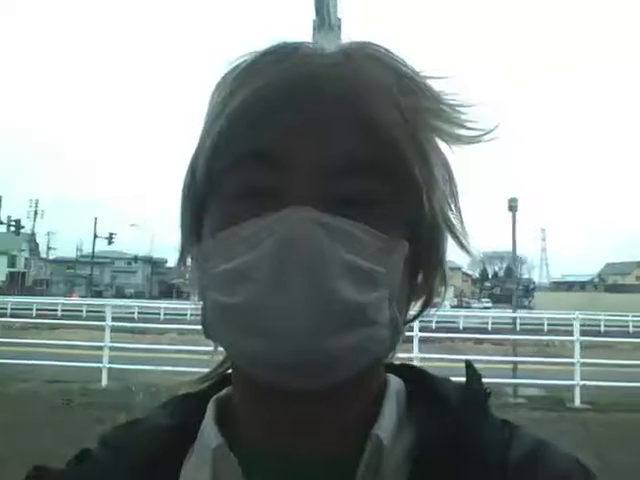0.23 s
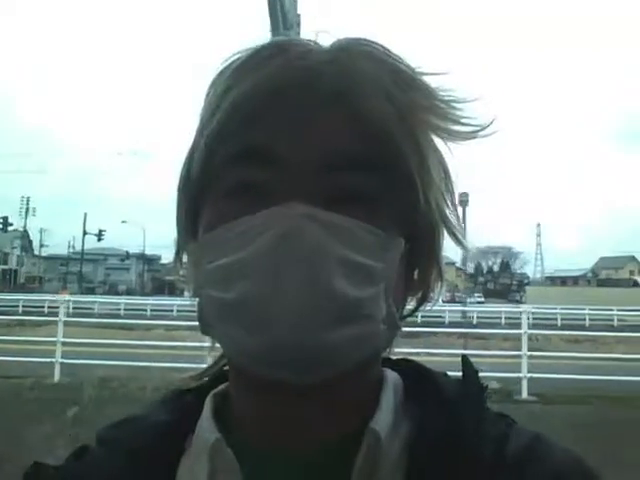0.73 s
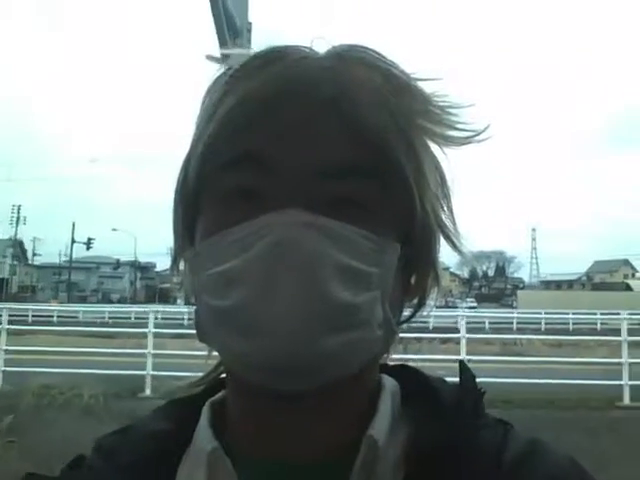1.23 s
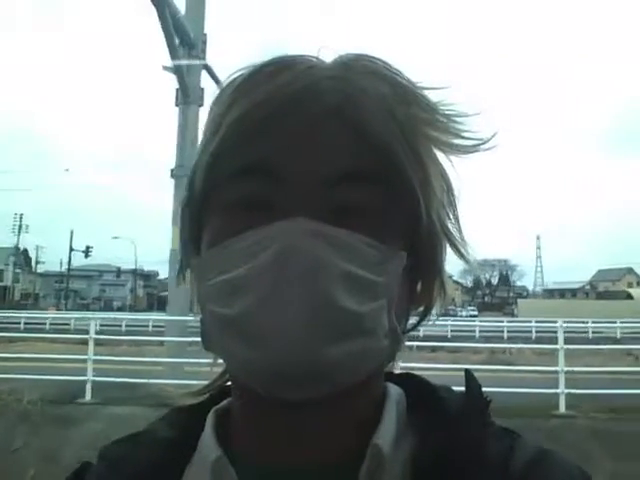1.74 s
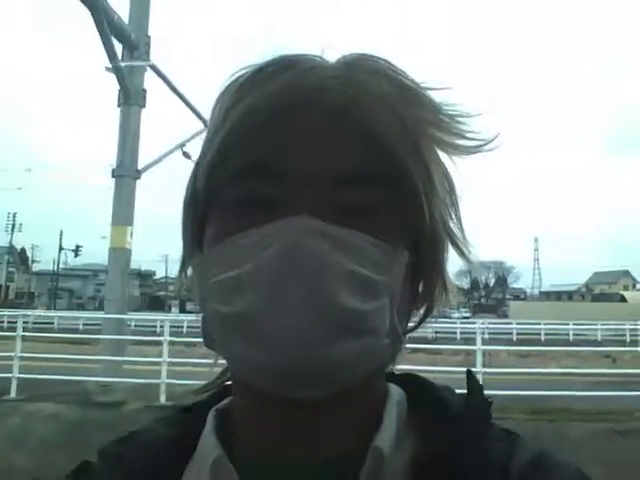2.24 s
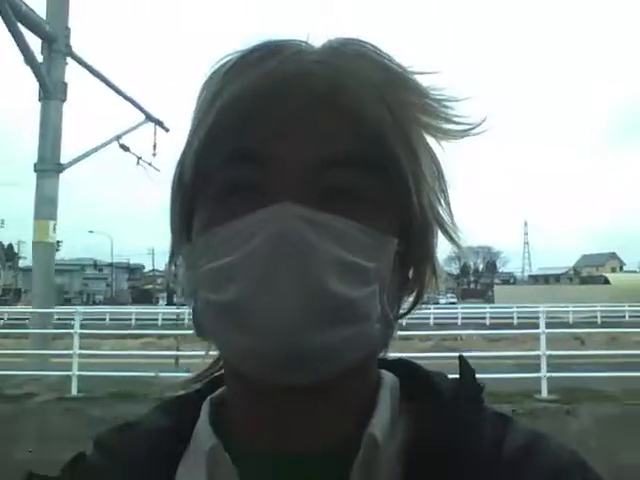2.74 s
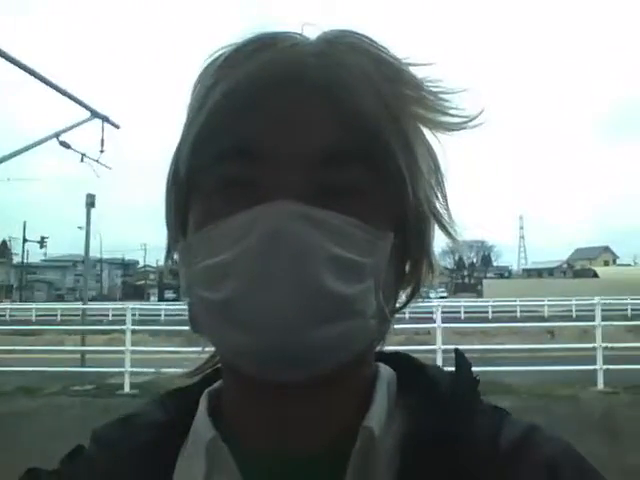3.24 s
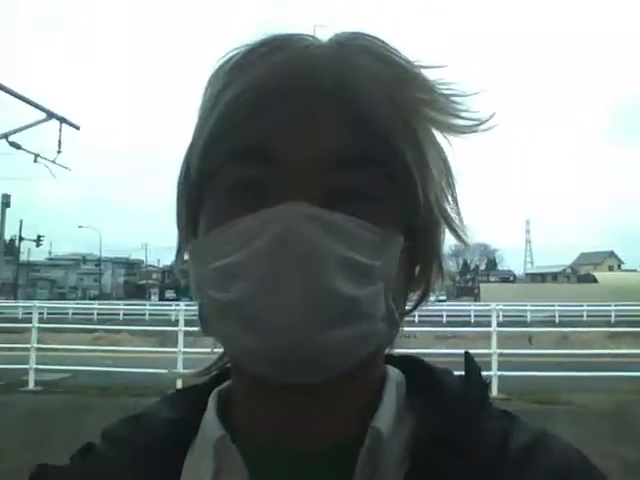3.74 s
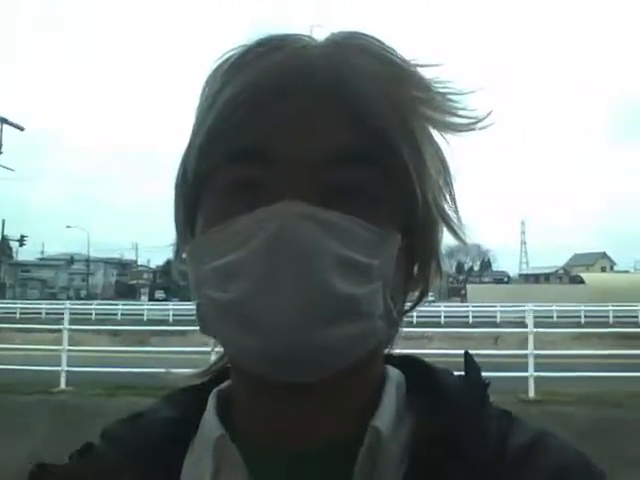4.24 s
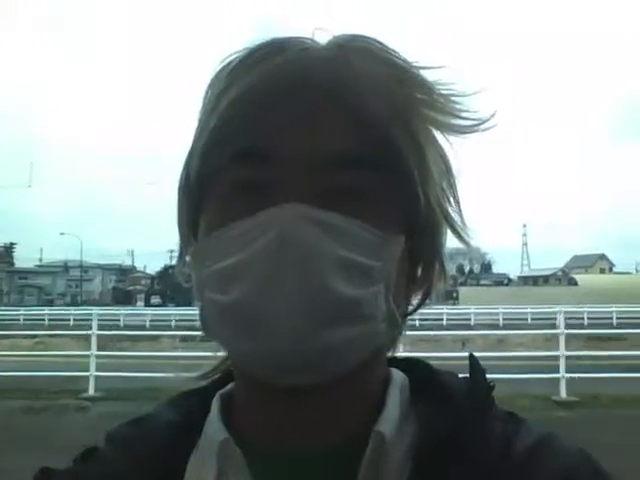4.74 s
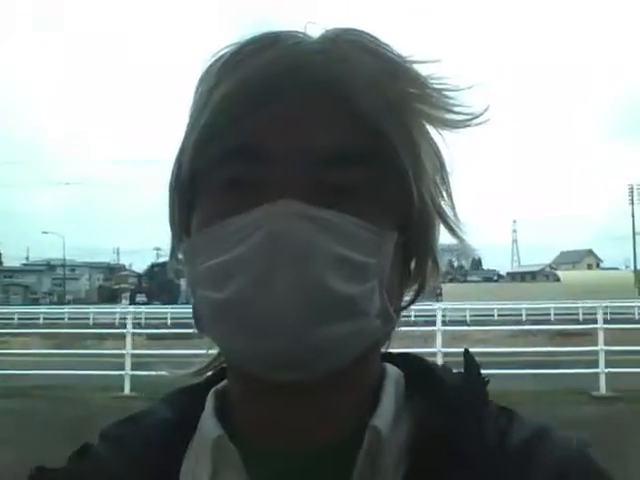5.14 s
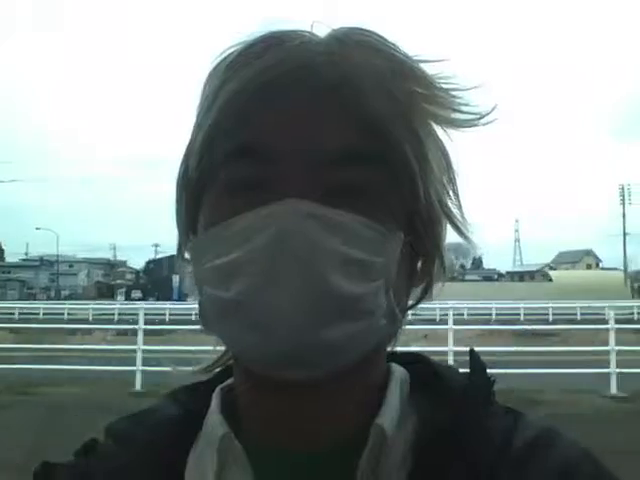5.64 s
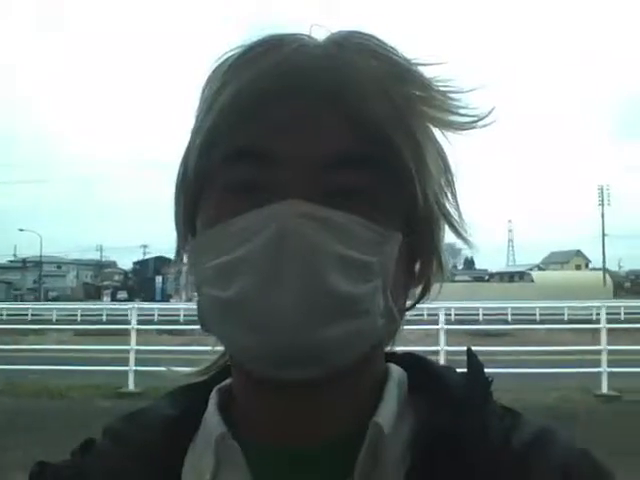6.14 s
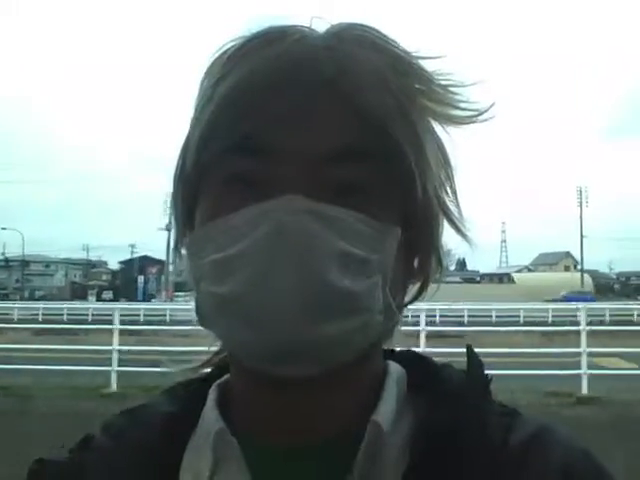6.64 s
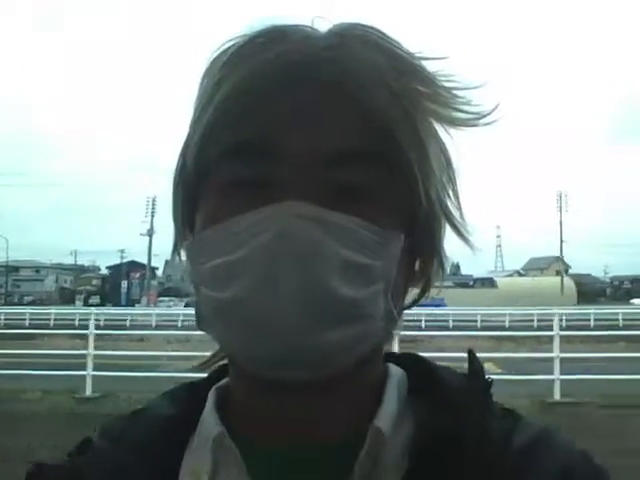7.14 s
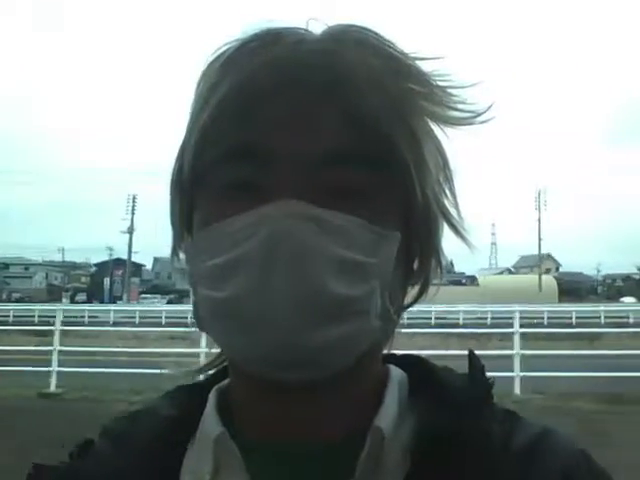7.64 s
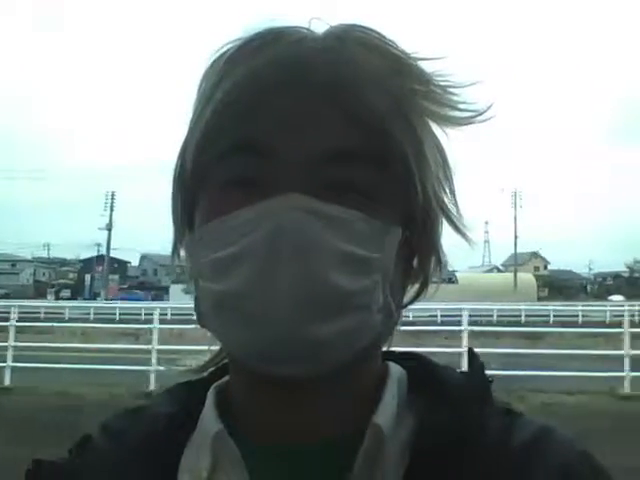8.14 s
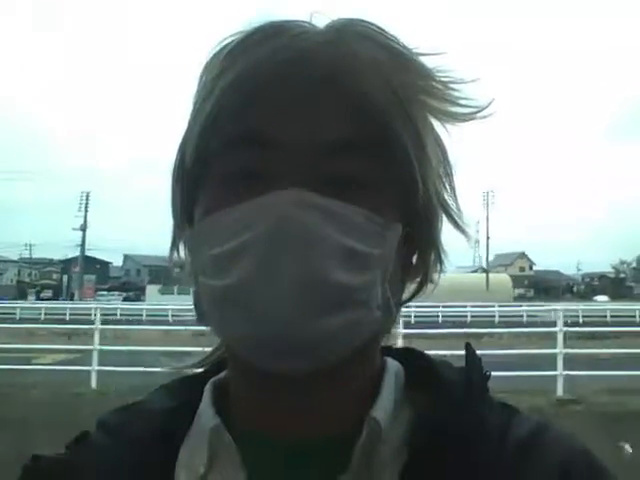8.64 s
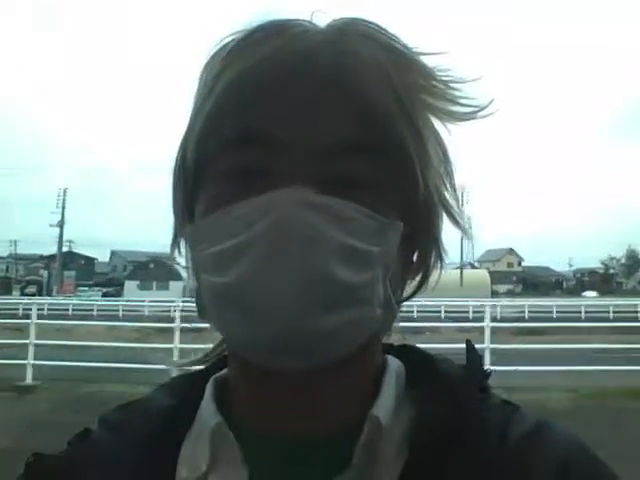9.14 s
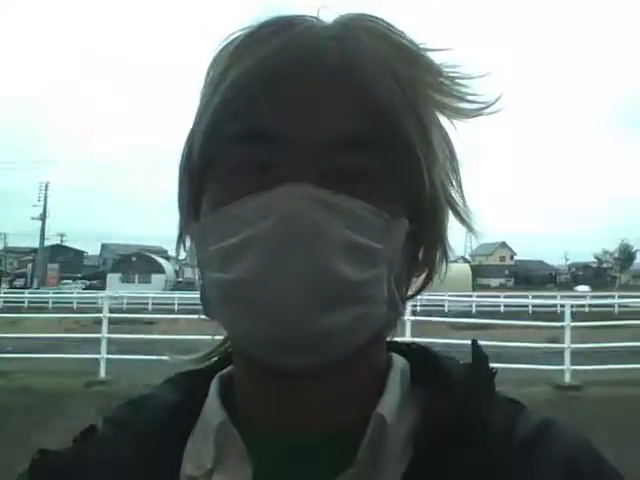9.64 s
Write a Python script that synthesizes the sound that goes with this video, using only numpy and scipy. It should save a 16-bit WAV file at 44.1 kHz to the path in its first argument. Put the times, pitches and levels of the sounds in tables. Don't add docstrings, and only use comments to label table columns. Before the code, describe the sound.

Inside a train carriage pulling away, a fixed-pitch buzzing drone from underfloor machinery dominates, with electrical hum and airy panel hiss. Close to the microphone, a small plastic object knocks twice, then ticks with a faint cloth brush. A motor whine climbs briefly, a high converter tone strengthens, rolling rumble grows, and soft thumps from rail joints arrive later, the strongest around two thirds through.

```python
import sys
import numpy as np
from scipy import signal
from scipy.fft import rfft, irfft, next_fast_len
from scipy.io import wavfile
from scipy.ndimage import map_coordinates

SR = 44100
rng = np.random.default_rng(int(sys.argv[2]) if len(sys.argv) > 2 else 0)


def convert_level_to_amplitude(level_db):
    exponent = np.asarray(level_db, float) / 20
    return 10 ** exponent


def wav_record(signal):
    frames = np.transpose(np.atleast_2d(signal))
    bounded = np.clip(frames, -1, 1)
    quanta = np.round(bounded * 32767).astype(np.int16)
    wavfile.write(sys.argv[1], SR, quanta)


N = 436149

SHAFT_HZ, TOP_ORDER = 27.9953, 535
MAINS_HZ, CHOPPER_HZ = 60.008, 1600.12
START_S, CUTOFF_HZ = .0802, 14960

# (multiple of the mains, level [dB rms])
MAINS_TONES = [(1, -55), (2, -46), (22, -63), (24, -60), (26, -61), (29, -72), (30, -62), (32, -68),
               (58, -78)]
# (frequency [Hz], level [dB rms], wander [Hz])
CARRIERS = [(3200.25, -74, .1), (14400, -82, .1), (690, -58, .5), (662, -62, .5), (1061, -65, 1.1)]
# (frequency [Hz], density [dB per Hz])
HISS = [(200, -98), (500, -77.5), (800, -80), (1000, -79.5), (2000, -84.5), (3300, -83.5), (3600, -88),
        (5500, -90), (6400, -96.5), (8000, -101), (9500, -103), (11300, -102), (11800, -107), (15000, -110)]
# (frequency [Hz], width [Hz], height over the hiss [dB])
PANELS = [(653, 21, 16), (810, 60, 5), (1130, 37, 3), (1590, 97, 1), (2340, 160, 3.5), (4800, 240, 5.5)]
# (time [s], frequency [Hz], level [dB])
WHINE = [(2.0, 625, -75), (2.4, 674, -60), (3.0, 746, -66), (3.7, 900, -68), (4.2, 990, -80)]
# (middle [s], level [dB], length [s])
JOINTS = [
    (2.57, -40, .09),
    (6.385, -31, .08),
    (6.847, -24, .105),
    (9.12, -32, .06),
]
# (time [s], peak [dB], share of low knock [0-1], pitch scale of the ticks [ratio])
CLICKS = [
    (.4935, -34, .5, 1.0),
    (.4985, -22, .9, 1.0),
    (.5425, -26, .9, .95),
    (1.467, -31, .02, 1.33),
    (1.506, -40, .2, 1.2),
]
# (time [s], level [dB rms])
CHOPPER = [(0, -55.5), (1.7, -53), (3, -49), (5.5, -45), (9.9, -45)]
# (frequency [Hz], level over the hiss density [dB])
FINE_ORDERS = [(2800, 19), (3500, 9.5), (6000, 10), (11000, 13.5), (13500, 15.5)]
# (centre [Hz], width [Hz], depth [dB])
CAPSULE_DIP = (8030, 1520, -11.5)
# (frequency [Hz], level [dB])
FLOOR_MODES = [(262, -3.5), (305, -5), (352, -4)]
# (frequency [Hz], level [dB], t60 [s])
KNOCK_MODES = [(900, -4, 0.011), (1800, -11, .008), (2300, -6, 0.0094)]
# (frequency [Hz], level [dB], t60 [s])
TICK_MODES = [(3160, -9, 0.0098), (3750, -13, .006), (4270, -4.5, 0.0078), (5040, -14, 0.0041),
              (7600, -22, .004), (11300, -18, .004), (12600, -22, .002)]
# (multiple of the shaft rate, level [dB rms], gain as the load comes
# on [dB])
STRONG_ORDERS = [(1, -41.5, 0), (2, -46.5, 0), (3, -48.7, 0), (4, -25.4, 0), (5, -40.9, 0), (6, -41.1, 0),
                 (7, -42.4, 0), (8, -38.6, 0), (9, -27.9, 0), (10, -32.2, 0), (11, -30, 0), (12, -40.6, 0),
                 (13, -51.9, -4), (14, -44.3, 0), (15, -38.1, 0), (16, -49.5, 0), (17, -45.1, 7),
                 (18, -38.5, 0), (19, -45.9, 3), (20, -40.8, 0), (21, -47.7, 0), (22, -39.1, 0),
                 (23, -48, 9), (24, -39.9, 0), (25, -48.3, -6), (26, -31.5, 4.6), (27, -52.4, -5),
                 (28, -53.4, 0), (29, -45.5, 9), (30, -53.5, 0),
                 (35, -49.4, 0), (38, -56, 6), (41, -46.7, 0), (43, -48.7, 0), (44, -52.8, 0),
                 (45, -53.5, -7), (46, -51.4, 0), (47, -52.5, 5), (54, -53, -11), (56, -53.8, 6),
                 (57, -51.5, 0), (60, -55.6, 4), (63, -55, 8), (65, -54.2, 0), (66, -54.8, 0),
                 (77, -59.4, 8), (82, -58.3, 18), (86, -59.5, 8), (88, -58.4, 4), (89, -59.2, 0),
                 (92, -61.3, 6), (94, -59.7, 5), (113, -64.7, 0)]
# (frequency [Hz], level [dB rms], gain as the load comes on [dB])
WEAK_ORDERS = [(870, -56, 3), (1010, -64.5, 1), (1430, -56, 2), (1720, -64.5, 2), (2150, -66, 5),
               (2740, -68, 4), (3100, -73, 1.5), (3360, -69.5, 1.5)]
# (time [s], share of the final speed [ratio])
SPEED = [(0, .05), (2.5, .25), (5, 0.68), (7, 0.92), (9.9, 1.07)]
# (low edge [Hz], high edge [Hz], level at rest [dB], gain at final speed [dB],
#                 lump depth [dB], lump rate [per s])
ROLLING_LAYERS = [
    (16, 54, -48.5, 9, 2.5, 3.3),
    (81, 214, -50, 14, 2.5, 4.3),
    (170, 417, -53, 10.5, 1.5, 6),
    (380, 2400, -65.5, 14, 1, 3.4),
]
# (peak [s], level [dB], rise [dB per s], fall [dB per s])
RUSTLES = [
    (1.52, -47, 190, 250),
    (2.48, -53, 170, 150),
    (6.87, -60, 150, 120),
]


def seconds():
    return np.arange(N) / SR


def in_time(rows):
    s, *columns = np.transpose(rows)
    return [np.interp(seconds(), s, column) for column in columns]


def at_hz(points, hz):
    points_hz, points_db = np.array(points)[:, :2].T
    return np.interp(np.log(hz + 1), np.log(points_hz), points_db)


def drift(rate):
    r = np.exp(-80 * np.pi * rate / SR)
    slow = signal.lfilter([1], [1, -2 * r, r * r], rng.standard_normal(N // 40 + 4002))[4000:]
    slow = (slow - slow.mean()) / slow.std()
    return np.interp(np.arange(N) / 40, np.arange(len(slow)), slow)


def band(low_hz, high_hz):
    sos = signal.butter(2, [low_hz, high_hz], "band", fs=SR, output="sos")
    noise = signal.sosfilt(sos, rng.standard_normal(N + SR))[SR:]
    return noise / noise.std()


def ring(x, hz, t60):
    r, w = convert_level_to_amplitude(-60 / (t60 * SR)), 2 * np.pi * hz / SR
    return signal.lfilter([0, np.sin(w)], [1, -2 * r * np.cos(w), r * r], x + 1e-18)


def hiss(turns):
    size = next_fast_len(N)
    hz = np.arange(size // 2 + 1) * SR / size
    colour_db = at_hz(HISS, hz)
    for panel_hz, width_hz, db in PANELS:
        colour_db += db / (1 + (2 * (hz - panel_hz) / width_hz) ** 4)
    spectrum = rfft(rng.standard_normal(size)) * convert_level_to_amplitude(colour_db) * (hz > 100)
    noise = irfft(spectrum, size)[:N] * np.sqrt(SR / 2)
    pulse_db, patchy_db = 1.0, 0.5
    return noise * convert_level_to_amplitude(pulse_db * np.sin(2 * np.pi * turns) + patchy_db * drift(6.2))


def supply():
    tones = [(k * MAINS_HZ, db, .02) for k, db in MAINS_TONES] + CARRIERS
    flutter, wander = drift(3.0), drift(1.0)
    out = np.zeros(N)
    for hz, db, wander_hz in tones:
        cycles = rng.random() + np.cumsum(hz + wander_hz * wander) / SR
        out += convert_level_to_amplitude(db + 0.99 * flutter) * np.sqrt(2) * np.sin(2 * np.pi * cycles)
    return out


def rolling():
    speed, = in_time(SPEED)
    out = np.zeros(N)
    for low_hz, high_hz, rest_db, gain_db, lumps_db, rate in ROLLING_LAYERS:
        level_db = rest_db + gain_db * speed + lumps_db * drift(rate)
        out += convert_level_to_amplitude(level_db) * band(low_hz, high_hz)
    return out


def joints():
    out = np.zeros(N)
    for s, level_db, length in JOINTS:
        swell = np.hanning(round(length * SR))
        t, at = np.arange(len(swell)) / SR, round((s - length / 2) * SR)
        for hz, db in FLOOR_MODES:
            mode = np.sin(2 * np.pi * (hz * t + rng.random()))
            out[at:at + len(t)] += swell * convert_level_to_amplitude(level_db + db) * mode
    return out


def whine():
    hz, level_db = in_time(WHINE)
    tone = np.sqrt(2) * np.sin(2 * np.pi * np.cumsum(hz) / SR)
    return convert_level_to_amplitude(level_db + 2.1 * drift(5)) * tone


def rustle():
    t, level = seconds(), np.zeros(N)
    for s, db, rise, fall in RUSTLES:
        level += convert_level_to_amplitude(db - np.maximum(rise * (s - t), fall * (t - s)))
    grain = convert_level_to_amplitude(2.5 * drift(120))
    return level * grain * (band(2500, 6100) + 0.25 * band(8500, 12500))


def clicks():
    out = np.zeros(N)
    for s, peak_db, knock, scale in CLICKS:
        touch = np.zeros(900)
        touch[[0, 1, 30, 31]] = convert_level_to_amplitude(peak_db) * np.array([.5, 0.61, -0.32, -0.26])
        low = sum(convert_level_to_amplitude(db) * ring(touch, hz, t60) for hz, db, t60 in KNOCK_MODES)
        high = np.zeros(900)
        for k, (hz, db, t60) in enumerate(TICK_MODES):
            high += (-1) ** k * convert_level_to_amplitude(db) * ring(touch, hz * scale, t60)
        out[round(s * SR):][:900] += 1.82 * (knock * low + high)
    return out


def chopper():
    level_db, = in_time(CHOPPER)
    tone = np.sqrt(2) * np.sin(2 * np.pi * CHOPPER_HZ * seconds())
    skirt = 0.38 * band(1540, 1648)
    return convert_level_to_amplitude(level_db) * (tone + skirt)


def order_levels(hz):
    scatter, swell_scatter = rng.standard_normal((2, len(hz)))
    weak = np.array(WEAK_ORDERS)
    coarse = hz < 3370
    weak_db = at_hz(weak, hz) + 4 * np.clip(scatter, -2, 1)
    fine_db = at_hz(HISS, hz) + at_hz(FINE_ORDERS, hz) + 5 * scatter
    level_db = np.where(coarse, weak_db, fine_db)
    weak_swell_db = at_hz(weak[:, ::2], hz) + 4 * swell_scatter
    fine_swell_db = 6 * (hz > 12300)
    swell_db = np.where(coarse, weak_swell_db, fine_swell_db)
    for k, db, gain_db in STRONG_ORDERS:
        level_db[round(k)], swell_db[round(k)] = db, gain_db
    return level_db, swell_db


def machine(turns):
    count, size = 12, 16384
    wobble, loose_order = 0.0009, 14
    order = np.arange(TOP_ORDER + 1)
    level_db, swell_db = order_levels(order * SHAFT_HZ)
    level_db = level_db + np.outer(np.linspace(-.5, .5, count), swell_db)
    chance = rng.standard_normal(level_db.shape) + 1j * rng.standard_normal(level_db.shape)
    change = wobble * order * chance
    loose = (order / loose_order) ** 2 * rng.standard_normal(len(order))
    phase = -np.pi / 2 * order ** 2 + loose
    lines = convert_level_to_amplitude(level_db) * np.exp(1j * phase) * (order > 0)
    lines = lines * (1 + change) / np.sqrt(1 + 2 * (wobble * order) ** 2)
    cycles = irfft(lines, size) * size / np.sqrt(2)
    cycles = np.concatenate([cycles, cycles[:, :1]], axis=1)
    return map_coordinates(cycles, [np.linspace(0, count - 1, N), turns % 1 * size], order=1)


def scene():
    turns = np.cumsum(SHAFT_HZ + .0015 * drift(0.26)) / SR
    background = hiss(turns) + supply() + rolling() + joints() + whine()
    near_microphone = rustle() + clicks()
    return (background + near_microphone + chopper() + machine(turns))[None]


def band_limit(x):
    return signal.sosfilt(signal.butter(12, 15070, fs=SR, output="sos"), x)


def record(dry):
    size = next_fast_len(N + SR // 10)
    hz = np.arange(size // 2 + 1) * SR / size
    dip_hz, width_hz, dip_db = CAPSULE_DIP
    dip = convert_level_to_amplitude(dip_db * np.exp(-(2 * (hz - dip_hz) / width_hz) ** 2))
    longer = np.pad(dry, [(0, 0), (0, size - N)], "reflect")
    coloured = irfft(rfft(longer) * dip * (hz < CUTOFF_HZ), size)[:, :N]
    switch_on = np.clip((seconds() - START_S) * SR / 3, 0, 1)
    fade_out = np.clip((N / SR - seconds()) / .004, 0, 1)
    return band_limit(coloured * switch_on * fade_out)


dry = scene()
out = record(dry)
wav_record(out)
```